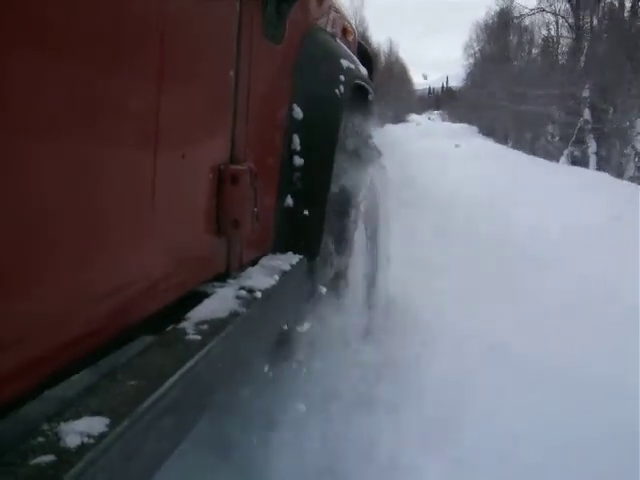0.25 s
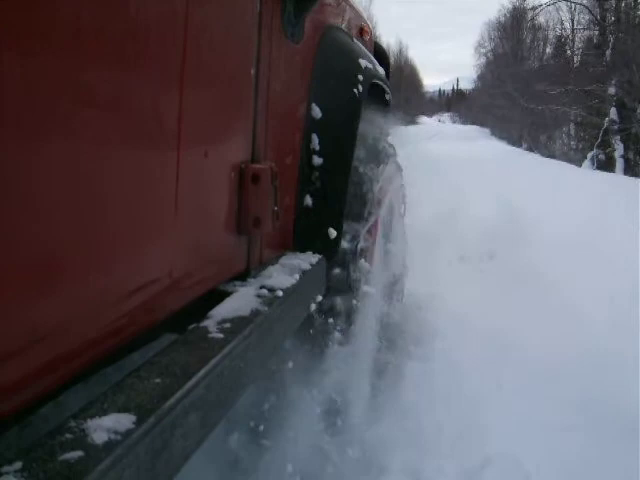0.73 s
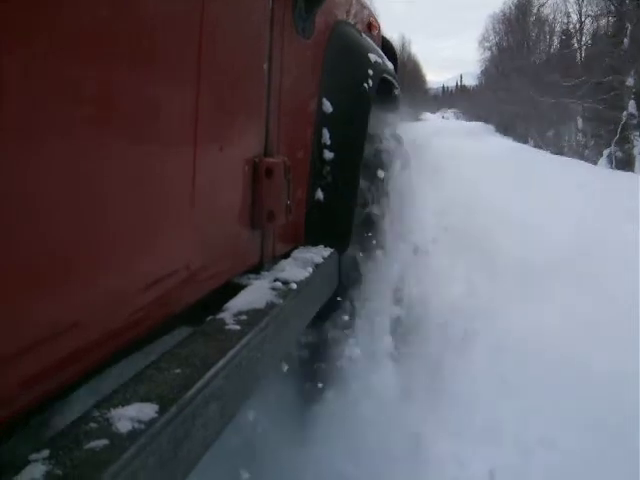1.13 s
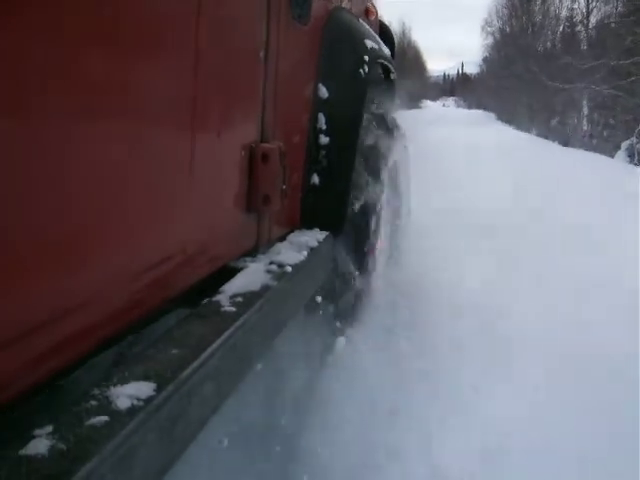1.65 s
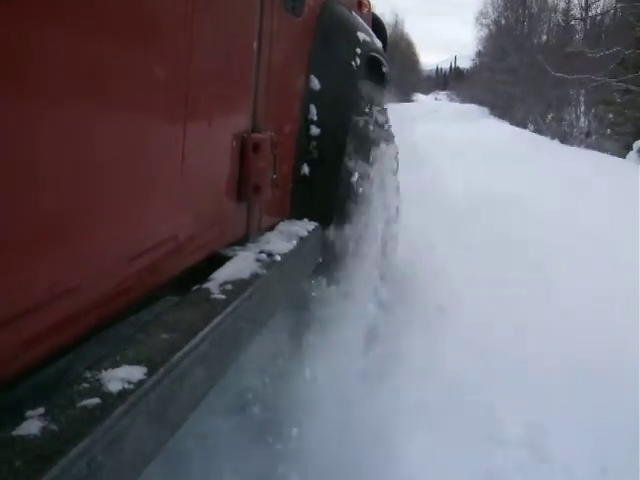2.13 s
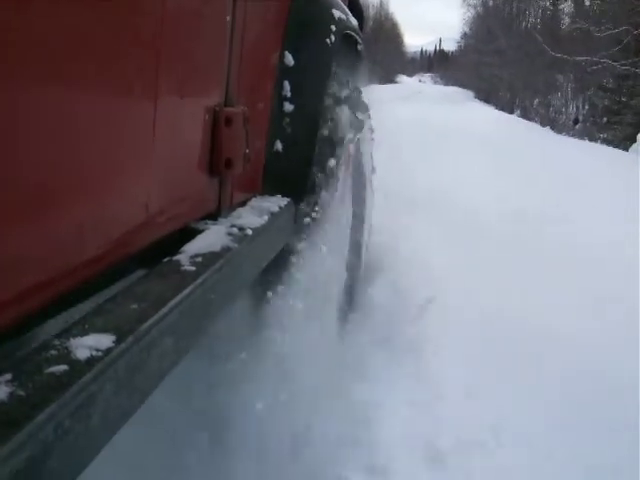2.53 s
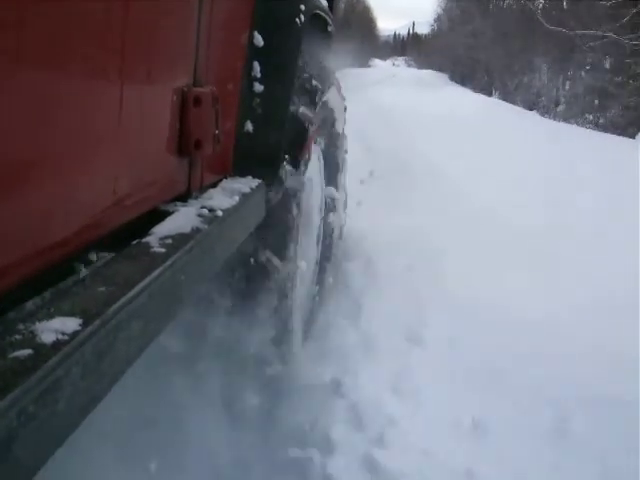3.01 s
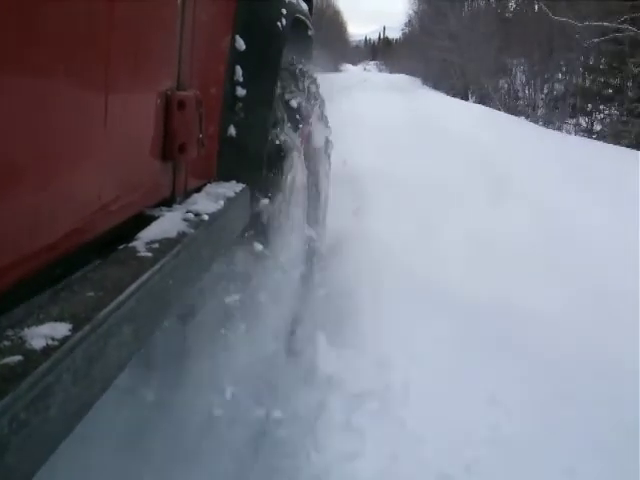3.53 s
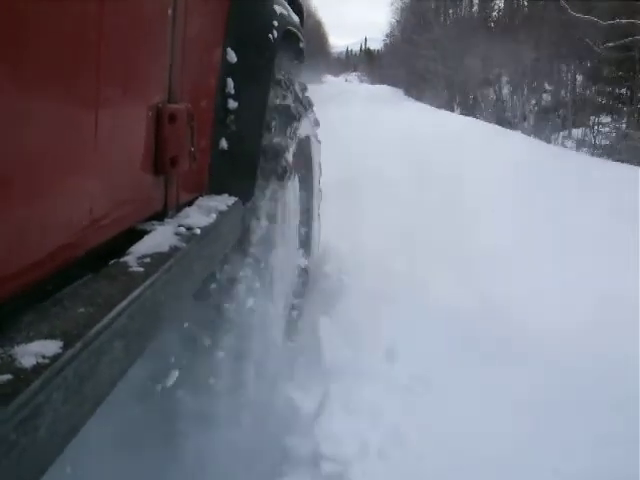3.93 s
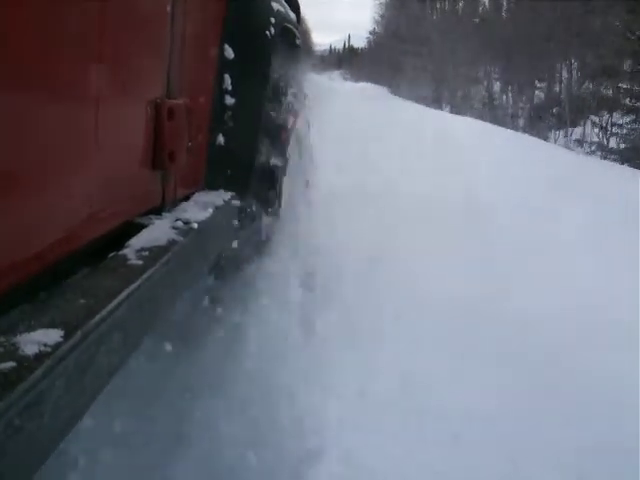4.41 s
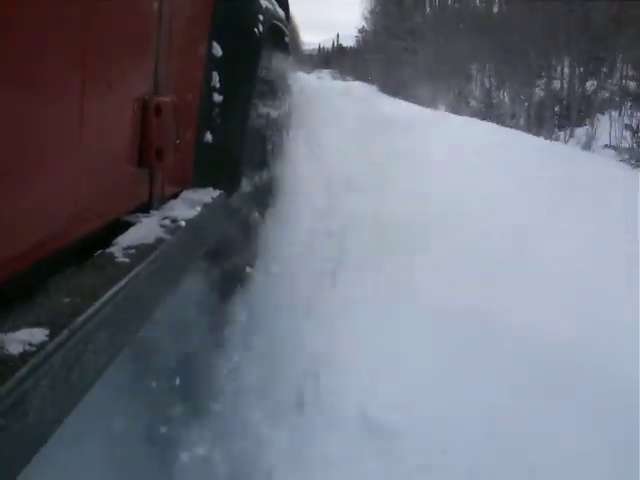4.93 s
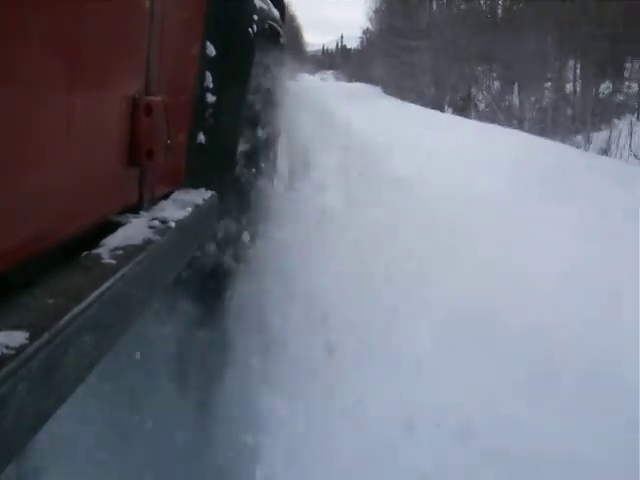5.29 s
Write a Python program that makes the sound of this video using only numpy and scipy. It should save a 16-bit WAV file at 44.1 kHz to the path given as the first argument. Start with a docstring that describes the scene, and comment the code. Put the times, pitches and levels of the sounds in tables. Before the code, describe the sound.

Continuous engine drone from a heavy vehicle ploughing through snow, heard close to the wheel without echo. The uneven exhaust throbs and rattles, barely changing speed; bodywork knocks and panels tick. Underneath is a broad, low tyre rumble, above it a soft grainy spray. Occasional tiny snow hits tap metal, a sharp click comes before halfway, and a harder snap comes near the end. The microphone sounds band-limited.

```python
"""Just outside the door of a V8 truck, which pulls steadily through deep snow.
The exhaust burbles in a lopsided eight-beat pattern, built from wavering tones locked to the engine cycle.
Impulses knock through ringing bodywork, flaring noise makes the rasp, noise ticks make the valves,
and an unsteady sine is the whine of the drive gears. Shaped noise is the tyre churning and throwing powder,
short noise bursts are crumbs of snow hitting the sill, and one fast-dying pulse is a sharp click."""
import sys
import numpy as np
from scipy import signal
from scipy.fft import rfft, irfft, next_fast_len
from scipy.io import wavfile
from scipy.ndimage import uniform_filter1d, map_coordinates

SR = 44100
rng = np.random.default_rng(int(sys.argv[2]) if len(sys.argv) > 2 else 0)


def inscribe(sig):
    """Save sig as 16-bit PCM at rate SR to the path in sys.argv[1].

    A 1-D sig is mono; a 2-D sig holds one channel per row.
    Samples are clipped to [-1, 1] before scaling.
    """
    pcm = np.round(np.clip(np.atleast_2d(sig).T, -1, 1) * 32767)
    wavfile.write(sys.argv[1], SR, pcm.astype(np.int16))


N = 245195  # length of the scene in samples


def amp(db):
    """Turn decibels into a gain."""
    return 10 ** (np.asarray(db) / 20)


def unit(x):
    """Scale x to an rms (average strength) of 1."""
    return x / np.sqrt(np.mean(x ** 2) + 1e-20)


def curves(rows):
    """Draw straight lines between the rows: one value per sample for each column after the time."""
    times, *columns = np.transpose(rows)
    t = np.arange(N) / SR
    return [np.interp(t, times, column) for column in columns]


def wobble(rate):
    """A smooth random curve with `rate` random points a second."""
    points = rng.standard_normal(int(N * rate / SR) + 4)
    return map_coordinates(points, [np.arange(N) * rate / SR])


def filtered(x, response):
    """Multiply the spectrum of x by a response, given as a function of frequency."""
    padded = next_fast_len(N + SR // 2)
    hz = np.fft.rfftfreq(padded, 1 / SR)
    return irfft(rfft(x, padded) * response(hz), padded)[:N]


def coloured(x, points):
    """Shape x by (frequency [Hz], level [dB]) points on a log frequency axis, at rms 1."""
    point_hz, db = np.transpose(points)
    return unit(filtered(x, lambda hz: amp(np.interp(np.log(hz + 1), np.log(point_hz), db))))


def ringing(x, modes):
    """Ring x through side-by-side resonances (centre [Hz], width [Hz], level [dB]), at rms 1."""
    def response(f):
        return sum(
            amp(db) * 1j * f * width / (centre ** 2 - f ** 2 + 1j * f * width)
            for centre, width, db in modes)
    return unit(filtered(x, response))


def low_pass(x, corner_hz, order):
    """Remove what lies above the corner; a higher order falls more steeply."""
    return filtered(x, lambda hz: 1 / np.sqrt(1 + (hz / corner_hz) ** (2 * order)))


CLICK_S = 2.1034  # when the click comes [s]
# Engine speed, sagging and recovering under a steady throttle: (time [s], speed [revolutions a minute])
ENGINE_SPEED = [(0.0, 2063.9), (0.4, 2057.1), (1.6, 2084.9), (3.0, 2050.9), (4.3, 2055.6), (5.56, 2077.3)]


def crank():
    """Count four-stroke cycles, each two turns of the crank; the beat jumps ahead at the click."""
    rpm, = curves(ENGINE_SPEED)
    start, jump = 0.63, 0.4  # [cycles]
    after_click = np.arange(N) > CLICK_S * SR
    return start + np.cumsum(rpm) / (120 * SR) + jump * after_click


# Exhaust tones: (multiple of the cycle rate [-], rms level before wavering and the final trim [dB])
EXHAUST_TONES = [(4, -35.5), (5, -29.5), (7, -46.5), (8, -42.5), (9, -42.5), (10, -41), (11, -35),
                 (12, -35), (13, -42), (14, -36), (15, -45), (17, -41.5), (18, -34.5), (19, -33), (20, -37),
                 (21, -46.5), (24, -37.5), (25, -52), (26, -34.5), (27, -37), (30, -37.5), (32, -39.5),
                 (33, -38), (34, -42.5), (35, -34.5), (37, -45.5), (38, -46), (39, -44), (40, -41.5),
                 (41, -40)]
# Resonances of the exhaust pipe: (frequency [Hz], point where it swells [cycles, 0-1])
PIPE_RESONANCES = [(78, 0.54), (140, 0.71), (200, .39), (325, 0.98), (455, .22), (570, .48), (700, 0.8)]


def exhaust(cycle, waver_db=1, smear_rad=0.37, shake_rad=0.091):
    """Uneven firing feeds many multiples of the cycle; tones near one pipe resonance throb together."""
    pipe_hz, swells_at = np.transpose(PIPE_RESONANCES)
    cycle_hz = np.median(np.diff(cycle)) * SR
    out = np.zeros(N)
    for multiple, db in EXHAUST_TONES:
        nearest = np.argmin(np.abs(pipe_hz - multiple * cycle_hz))
        phase = 2 * np.pi * multiple * (cycle - swells_at[nearest])
        phase += smear_rad * rng.standard_normal() + shake_rad * wobble(8.9)
        # A cosine times sqrt(2) has rms 1.
        out += amp(db + waver_db * wobble(5)) * np.sqrt(2) * np.cos(phase)
    return out


# The cylinders in firing order: (relative knock level [dB], relative rasp level [dB])
CYLINDER_LEVELS = [(-4, 3), (6.5, -5.5), (-1, 3), (-1.5, -3.5), (5.5, 0.5), (-11, 1), (3, 0), (-6, -1)]


def firings(cycle, index, scatter_db, jitter_s):
    """One impulse each time this cylinder fires, never quite alike in size or timing."""
    firing_points = np.arange(1, int(cycle[-1]) + 1) + index / len(CYLINDER_LEVELS)
    at = np.interp(firing_points, cycle, np.arange(N))
    chance = rng.standard_normal((len(at), 2))
    jittered = np.abs(at + jitter_s * SR * chance[:, 0])
    at = jittered[at < N - 1]  # drop firings after the end
    sizes = amp(scatter_db * chance[:len(at), 1])
    return np.bincount(at.astype(int), sizes, N)[:N]


# Bodywork rung by the knocks: (centre [Hz], width [Hz], relative level [dB])
BODY_RESONANCES = [(768, 50, -3), (850, 60, -3), (1028, 40, -1), (1130, 40, -1), (1215, 45, -3),
                   (1287, 32, -1), (1392, 55, 1.5), (1440, 28, 1.5), (1544, 26, 4), (1680, 70, -7),
                   (1795, 45, -5)]
# What the bonnet lets through of the knocks: (frequency [Hz], relative level [dB])
BONNET_COLOUR = [(300, -32.5), (600, -8), (800, 4), (1550, 0.5), (1800, -6.5), (1950, -19.5), (2400, -22.5),
                 (5000, -30.5)]


def knocks(cycle, spread_s=0.00304, size=2048, count=70):
    """Each cylinder knocks the bodywork by its own path, which delays every frequency differently."""
    out = np.zeros(N)
    bins = np.linspace(0, count - 1, size // 2 + 1)
    for index, (knock_db, _) in enumerate(CYLINDER_LEVELS):
        delay_s = spread_s * np.interp(bins, np.arange(count), rng.random(count))
        # Adding the delays up along frequency gives the phase of the path.
        phase = -2 * np.pi * np.cumsum(delay_s) * SR / size
        path = irfft(np.exp(1j * phase))[:size // 2]
        blows = firings(cycle, index, scatter_db=1.5, jitter_s=0.00003)
        out += amp(knock_db) * signal.fftconvolve(blows, path)[:N]
    return coloured(ringing(out, BODY_RESONANCES), BONNET_COLOUR)


# Colour of the rasp of the engine bay: (frequency [Hz], relative level per Hz [dB])
RASP_COLOUR = [(150, -26.5), (400, -2), (750, -2), (1100, -1), (1300, -0.5), (1400, 3), (1510, -6.5),
               (1780, -4.5), (2050, -19.5), (3000, -26), (5500, -60)]


def rasp(cycle, rise_db=1.5):
    """Turbulent noise takes a new strength at every firing and grows slightly until the next."""
    beat = cycle * len(CYLINDER_LEVELS)
    firing_now = beat.astype(int) % len(CYLINDER_LEVELS)
    strength_db = np.array(CYLINDER_LEVELS)[firing_now, 1]
    noise = amp(strength_db + rise_db * (beat % 1)) * rng.standard_normal(N)
    return coloured(noise, RASP_COLOUR)


# Steel panels rung by the valve gear: (centre [Hz], width [Hz], relative level [dB])
PANEL_RESONANCES = [(2220, 55, -3), (2386, 130, -2), (2788, 58, 3.5), (2864, 49, -1), (3840, 49, 0),
                    (4290, 190, -11.5)]


def valves(cycle, count=16, fall_db=30, uneven_db=1.5, tick_db=-7, swell_db=3.5, swells_at=0.3):
    """Valves tick in turn, unequally: a dry tick, and a ring of panels that swells once a cycle."""
    beat = cycle * count
    strengths = rng.permutation(np.linspace(-2, 2, count))
    strength_db = uneven_db * strengths[beat.astype(int) % count]
    ticks = amp(strength_db - fall_db * (beat % 1)) * rng.standard_normal(N)
    swell = amp(swell_db * np.cos(2 * np.pi * (cycle - swells_at)))
    panel_ring = ringing(swell * ticks, PANEL_RESONANCES)
    dry_ticks = coloured(ticks, [(1200, -20), (2500, 1.5), (4200, -3.5), (6500, -12.0)])
    return unit(panel_ring + amp(tick_db) * dry_ticks)


# Whine of the drive gears: (time [s], pitch before drift [Hz], level before wavering [dB])
GEAR_WHINE = [(0, 590, -35), (.95, 590, -35), (1.6, 599, -38), (2.85, 587, -36), (4.15, 576, -38),
              (5.56, 595, -36)]


def whine(drift_rad=0.7, waver_db=3):
    """The drive gears sing at their own pace, unsteadily, as the tyres slip and grip."""
    pitch_hz, db = curves(GEAR_WHINE)
    phase = 2 * np.pi * np.cumsum(pitch_hz) / SR + drift_rad * wobble(15)
    return amp(db) * unit(amp(waver_db * wobble(10)) * np.sin(phase))


# Colour of the tyre in snow: (frequency [Hz], relative level per Hz [dB])
CHURN_COLOUR = [(8, -21.5), (22, -3.5), (50, 2), (200, 2), (480, 1.5), (900, 1), (1500, -18), (2000, -20),
                (3000, -51)]


def churn(mean_db=-28.5, waver_db=0.87):
    """The tyre works through the snow: mostly low noise whose level wavers."""
    level = amp(mean_db + waver_db * wobble(6.9))
    return level * coloured(rng.standard_normal(N), CHURN_COLOUR)


# Colour of the thrown powder: (frequency [Hz], relative level per Hz [dB])
POWDER_COLOUR = [(800, -11), (1800, 1.5), (2200, 3.5), (3300, 2), (4200, -0.5), (4800, -6.7), (5250, -4),
                 (6000, -15)]


def powder(grains_per_s=900, grain_db=-5, clump_db=0.45):
    """Thrown snow: a fine hiss and separate grains that arrive in clumps."""
    clumps = amp(clump_db * wobble(22))
    lands = rng.random(N) < grains_per_s * clumps / SR
    grains = lands * rng.standard_normal(N)
    hiss = coloured(rng.standard_normal(N), POWDER_COLOUR)
    return unit(hiss + amp(grain_db) * clumps * coloured(grains, POWDER_COLOUR))


# Clods hitting the sill: (time [s], peak rms level [dB], pitch [Hz], time to fall by 60 dB [s])
SNOW_CRUMBS = [(.265, -35, 4200, .012), (.723, -37, 4320, .015), (.773, -39, 4650, .1),
               (1.378, -37.5, 4050, .015), (1.49, -40, 4270, .05), (3.794, -39, 3880, .012),
               (3.91, -43, 4700, .07), (4.531, -40, 3910, .012), (4.64, -38, 5000, 0.076),
               (5.184, -39, 4730, .03), (5.201, -23, 3080, 0.008)]


def crumbs(spread=0.19):
    """Each clod bursts against the metal: hard ones snap, soft ones crumble with a hiss."""
    out = np.zeros(N + SR)
    t = np.arange(SR // 8) / SR
    for start_s, db, hz, life_s in SNOW_CRUMBS:
        edges_hz = hz * np.exp([-spread, spread])
        band = signal.butter(3, edges_hz, "bandpass", fs=SR, output="sos")
        burst = signal.sosfilt(band, amp(-60 * t / life_s) * rng.standard_normal(len(t)))
        loudest = uniform_filter1d(burst ** 2, size=88).max()  # strongest 2 ms
        out[round(start_s * SR):][:len(t)] += amp(db) * burst / np.sqrt(loudest)
    return out[:N]


def click(db=-9.5, life_s=0.00015):
    """One dry, sharp click: a sudden step that dies away at once."""
    t = np.arange(N) / SR - CLICK_S
    return -amp(db) * (t >= 0) * np.exp(-np.abs(t) / life_s)


KNOCK_DB, RASP_DB = -30, -27  # rms before the revs alter them [dB]
VALVES_DB = -44  # rms [dB]
POWDER_DB = -41.5  # rms before the slow rise [dB]
BAY_DB_PER_RPM = 0.0137  # the engine bay grows louder as the revs rise
SPRAY_DB_PER_S = 0.18  # the tyre throws a little more powder as it goes


def scene():
    """Add engine and tyre, both close by without echo; the engine bay follows the revs."""
    cycle = crank()
    rpm, = curves(ENGINE_SPEED)
    t = np.arange(N) / SR
    effort_db = BAY_DB_PER_RPM * (rpm - rpm.mean())
    bay = amp(effort_db) * (amp(KNOCK_DB) * knocks(cycle) + amp(RASP_DB) * rasp(cycle))
    engine = amp(-0.74) * exhaust(cycle) + bay
    machinery = amp(VALVES_DB) * valves(cycle) + whine()
    tyre = churn()
    spray = amp(POWDER_DB + SPRAY_DB_PER_S * (t - t.mean())) * powder()
    return (engine + machinery + tyre + spray + crumbs())[None]


BAND_HZ, EDGE_HZ = 5400, 6200  # two treble limits for everything but the click
TOP_HZ = 15600  # treble limit for the whole sound, click included


def record(dry):
    """Narrow the scene's treble in two steps, then add the click, which reaches higher."""
    narrow = low_pass(low_pass(dry[0], BAND_HZ, order=16), EDGE_HZ, order=90)
    return low_pass(narrow + click(), TOP_HZ, order=60)[None]


dry = scene()
out = record(dry)
inscribe(out)
```